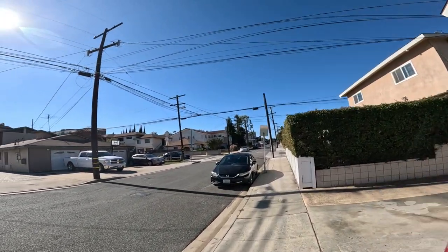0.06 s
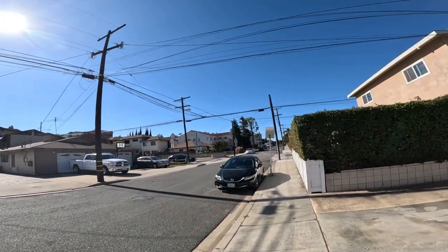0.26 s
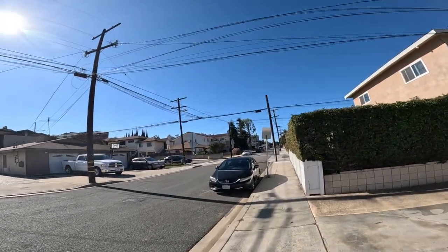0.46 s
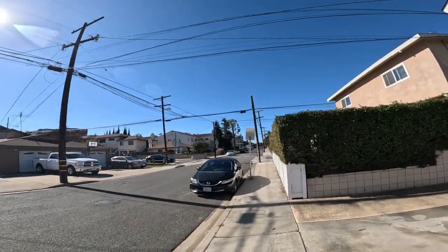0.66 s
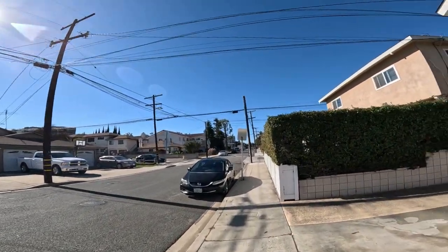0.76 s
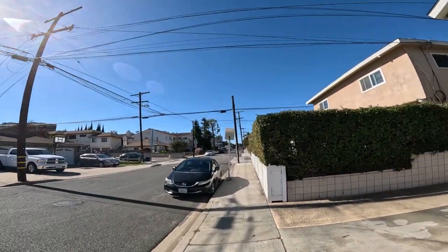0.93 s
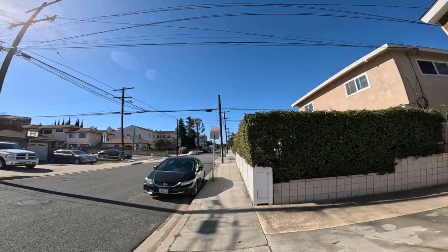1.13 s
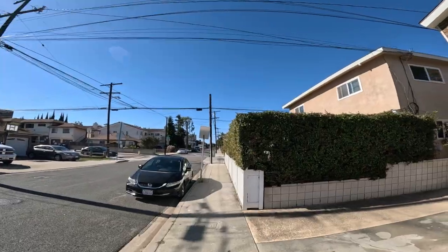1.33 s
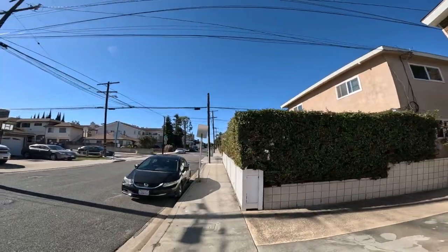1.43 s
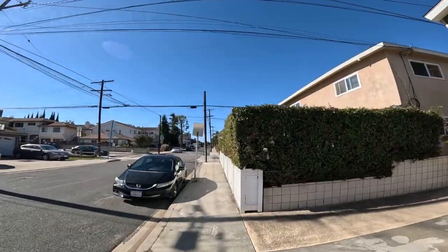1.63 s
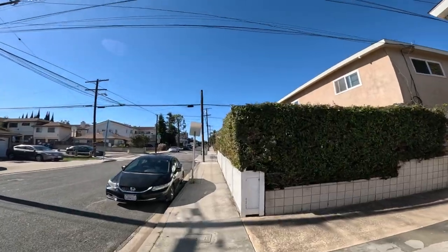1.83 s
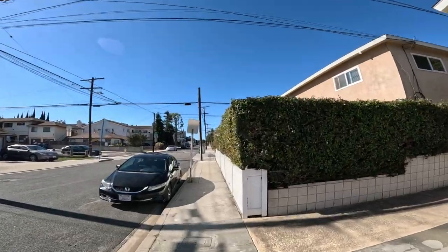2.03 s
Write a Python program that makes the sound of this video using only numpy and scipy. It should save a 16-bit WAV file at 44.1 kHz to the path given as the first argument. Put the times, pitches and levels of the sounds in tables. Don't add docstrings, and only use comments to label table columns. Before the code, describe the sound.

Low lumpy wind noise over soft, gritty footsteps on concrete in a quiet residential street

```python
import sys
import numpy as np
from scipy import signal
from scipy.fft import rfft, irfft
from scipy.io import wavfile
from scipy.ndimage import uniform_filter1d

SR = 44100
rng = np.random.default_rng(int(sys.argv[2]) if len(sys.argv) > 2 else 0)


def store_wav(level_fs):
    pcm = np.round(np.clip(np.atleast_2d(level_fs), -1, 1) * 32767)
    wavfile.write(sys.argv[1], SR, pcm.T.astype(np.int16))


def voltage_ratio(level):
    return 10 ** (np.asarray(level, float) / 20)


N = 91904


def rms_one(x):
    return x / np.sqrt(np.mean(x ** 2) + 1e-20)


def in_time(rows):
    s, *columns = np.transpose(rows)
    return [np.interp(np.arange(N) / SR, s, c) for c in columns]


def at_hz(points, hz):
    f, value = np.array(points)[:, 0], np.array(points)[:, 1]
    return np.interp(np.log(hz), np.log(f), value)


def drift(rate):
    r = np.exp(-80 * np.pi * rate / SR)
    noise = rng.standard_normal(N // 40 + 2002)
    slow = signal.lfilter([1], [1, -2 * r, r * r], noise)[2000:]
    return np.interp(np.arange(N) / 40, np.arange(len(slow)), rms_one(slow - slow.mean()))


def ring(clicks, hz, t60):
    r, w = voltage_ratio(-60 / (t60 * SR)), 2 * np.pi * hz / SR
    return signal.lfilter([0, np.sin(w)], [1, -2 * r * np.cos(w), r * r], clicks + 1e-18)


def bands(source, spectrum):
    bottom, top = spectrum[0][0], min(spectrum[-1][0], 0.35 * SR)
    edges = bottom * 2 ** np.arange(0, np.log2(top / bottom) + 0.4, 0.5)
    for k, (low, high) in enumerate(zip(edges, edges[1:])):
        hz = np.sqrt(low * high)
        sos = signal.butter(2, [low, high], "band", fs=SR, output="sos")
        settled = signal.sosfilt(sos, source[k % 2])[SR:]
        yield hz, voltage_ratio(at_hz(spectrum, hz)) * settled


def swell(start, rise, fall):
    t = np.arange(N) / SR - start
    return np.sin(np.pi / 2 * np.clip(t / rise, 0, 1)) ** 2 * np.exp(-np.maximum(t - rise, 0) / fall)


def click(s, db):
    out = np.zeros(N)
    out[int(s * SR)] = voltage_ratio(db)
    return out


# f/Hz, level/dB per Hz
HUSH = [(300, -6.5), (450, 0.5), (1130, -4.5), (2240, -13.5), (4000, -17.5), (5700, -23), (7500, -33),
        (14000, -37.5)]
# t/s, level/dB
SWELL = [(0.0, -56), (.25, -58), (.5, -55.5), (0.7, -54.5), (.9, -53), (1.1, -54.5), (1.35, -52.5),
         (1.6, -52.5), (1.85, -53), (2.08, -52)]


def hush():
    noise = rng.standard_normal((2, N + SR))
    out = sum(band * voltage_ratio(drift(6.0)) for hz, band in bands(noise, HUSH))
    return voltage_ratio(in_time(SWELL)[0] - 0.5) * rms_one(out)


# start t/s, length/s, level/dB, first f/Hz, last f/Hz
NOTES = [(0.733, 0.045, -71, 7250, 7200), (.785, .012, -75, 7250, 7250), (0.855, 0.018, -63, 3950, 3950),
         (.872, .03, -62, 3950, 3960), (0.897, 0.02, -63, 4000, 3600), (.91, .018, -60, 3950, 3700),
         (.93, .014, -64, 3600, 3550), (1.548, 0.036, -63, 2620, 2780), (1.585, 0.035, -70, 4800, 4700),
         (1.621, .014, -57, 3900, 4650), (1.632, 0.009, -58, 4850, 4950), (1.639, 0.012, -59, 4600, 4050),
         (1.655, .013, -57, 4250, 4420), (1.669, .014, -63, 4350, 4150)]
WARBLE_HZ, ECHO_S, ECHO_DB = 45, 0.006, -10
RASP, RASP_HZ = 0.27, 260


def birds():
    t, out, warble = np.arange(N) / SR, 0, WARBLE_HZ * drift(71.0)
    for s, length, db, from_hz, to_hz in NOTES:
        along = np.clip((t - s) / length, 0, 1)
        phase = 2 * np.pi * np.cumsum(from_hz + (to_hz - from_hz) * along + warble) / SR
        shape = np.sqrt(np.sin(np.pi * along).clip(0))
        out = out + np.sqrt(2) * voltage_ratio(db) * shape * np.sin(phase)
    lag = int(ECHO_S * SR)
    echoed = sum(voltage_ratio(ECHO_DB * k) * np.roll(out, int(lag * k ** 0.95)) for k in range(5))
    return echoed * voltage_ratio(drift(90.0)) * (1 - RASP + RASP * drift(RASP_HZ))


# t/s, level/dB
CLINKS = [
    (0.316, -72.5),
    (0.4777, -59),
    (0.507, -71),
    (.53, -70.5),
]
METAL_HZ = [5937, 9552]
# level/dB, time to fall 60 dB/s
METAL = [
    (0, .12),
    (-8, .07),
]


def clinks():
    knocks = sum(click(s, db) for s, db in CLINKS)
    soft = signal.windows.hann(int(0.0081 * SR))
    out = 0
    for hz, (db, t60) in zip(METAL_HZ, METAL):
        burst = soft * np.cos(2 * np.pi * hz * np.arange(len(soft)) / SR) * 4 / len(soft)
        out = out + voltage_ratio(db) * ring(np.convolve(knocks, burst)[:N], hz, t60)
    return out


# t/s, level/dB, length/s, brightness/dB per octave
SCUFFS = [(.002, -53, 0.02, -2), (.03, -51.5, 0.027, -6.5), (.085, -57.5, 0.035, -0.5),
          (.205, -58.5, 0.035, -7), (.37, -51, 0.037, -7), (.63, -56.5, 0.022, -2),
          (1.68, -54.5, 0.026, -5.5), (1.757, -48, 0.0095, -2.5), (1.785, -54, .04, -7.5),
          (0.054, -48, 0.042, -9.5), (0.309, -49, 0.08, -10.5), (0.407, -51.5, 0.03, -8),
          (0.588, -48, 0.046, -4.5), (0.604, -48.5, 0.12, -5), (0.694, -54, 0.057, -3.5),
          (0.748, -52.5, 0.12, -13.5), (1.144, -50.5, 0.041, -4), (1.168, -52.5, 0.17, -4),
          (1.578, -60.5, 0.023, -31.5), (1.663, -46, 0.066, -5.5), (1.754, -52.5, 0.07, -2.5),
          (1.873, -51.5, 0.028, -3), (1.985, -50.5, 0.033, -3)]
# f/Hz, level/dB per Hz
SOLE = [(350, -37), (600, -13), (900, -3.5), (1620, -8.5), (2400, -13), (6800, -23), (12000, -26)]
GRIT_PER_S, GRIT_DB, GRIT_LARGEST = 5000, 2, 3
SCUFF_RISE, SCUFF_TAIL = 0.39, 0.58


def scuffs():
    shape = (2, N + SR)
    hits = rng.random(shape) < GRIT_PER_S / SR
    sizes = voltage_ratio(GRIT_DB * np.minimum(rng.exponential(1, shape), GRIT_LARGEST))
    grit = hits * sizes * rng.choice([-1, 1], shape)
    slices = list(bands(grit, SOLE))
    spread = np.std(sum(band for hz, band in slices))
    out = 0
    for hz, band in slices:
        octaves = np.log2(hz / 1000)
        drags = sum(voltage_ratio(db + tilt_db * octaves) * swell(s, SCUFF_RISE * length, SCUFF_TAIL * length)
                    for s, db, length, tilt_db in SCUFFS)
        out = out + band / spread * drags
    return out


# t/s, peak level/dB, f/Hz, time to fall 60 dB/s
TICKS = [(.083, -61, 4400, .006), (.094, -60, 3950, .008), (.096, -62, 5500, .005), (.118, -59, 4000, .009),
         (.160, -42, 600, .01), (.1621, -48, 5800, .0018), (.213, -27, 330, .025), (.214, -32, 500, .017),
         (.214, -39, 750, .012), (.352, -39, 500, .02), (.381, -27, 350, .025), (.384, -35, 600, .015),
         (.424, -41, 800, .02), (.430, -33, 470, .016), (.497, -38, 420, .015), (.499, -44, 620, .014),
         (.600, -44, 780, .009), (.6111, -59, 7040, .003), (.612, -50, 1200, .01), (.624, -45, 800, .012),
         (.637, -50, 1500, .01), (.645, -55, 2210, .003), (.65, -47, 800, .012), (.835, -64, 8050, .002),
         (1.130, -34, 521, .019), (1.181, -54, 2440, .013), (1.2152, -44, 3400, .0015),
         (1.238, -54, 2250, .013), (1.597, -35, 580, .016), (1.600, -42, 800, .01), (1.672, -31, 380, .02),
         (1.691, -46, 1250, .01), (1.728, -39, 400, .015), (1.759, -41, 550, .012), (1.7615, -41, 804, .02),
         (1.7625, -41, 1360, .013), (1.763, -45, 2300, .004)]


def ticks():
    out = 0
    for s, db, hz, t60 in TICKS:
        twice = ring(ring(click(s, db), hz, t60), hz, t60)
        out = out + 2 * twice * 19 / (t60 * SR)
    return out


# t/s, length/s
OPEN = [(0.032, 0.023), (0.2, 0.021), (0.344, 0.019), (0.566, .012), (0.606, .12), (0.774, .02),
        (1.289, .03), (1.485, 0.047), (1.842, .015)]
SHELF_HZ, SHELF_DB, PATCH_DB = 7800, -7, 1.5
TOP_HZ, ABOVE_DB, OPEN_DB = 10300, -17, 1.5


def thin_top(x):
    spectrum, f, t = rfft(x, 2 * N), np.fft.rfftfreq(2 * N, 1 / SR), np.arange(N) / SR
    edges = [0, SHELF_HZ, SHELF_HZ + 900, SHELF_HZ + 1800, TOP_HZ, SR]
    parts = [irfft(spectrum * (f >= low) * (f < high), 2 * N)[:N] for low, high in zip(edges, edges[1:])]
    opened = np.clip(sum((t > s) & (t < s + length) for s, length in OPEN), 0, 1)
    top = voltage_ratio(ABOVE_DB + (OPEN_DB - ABOVE_DB) * uniform_filter1d(opened * 1.0, size=100))
    patchy = sum(p * voltage_ratio(PATCH_DB * drift(7.0)) for p in parts[1:4])
    return parts[0] + voltage_ratio(SHELF_DB) * (patchy + top * parts[4])


# t/s, f/Hz, level/dB
WHIRL = [
    (1.14, 69.96, -60),
    (1.19, 85, -16.5),
    (1.24, 114.4, -31),
    (1.31, 159.1, -24),
    (1.39, 206.6, -28.5),
    (1.42, 218.6, -52),
]


def whirl():
    hz, db = in_time(WHIRL)
    t = np.arange(N) / SR
    tone = np.sin(2 * np.pi * np.cumsum(hz * (1 + 0.077 * drift(25.0))) / SR)
    heard = (t > WHIRL[0][0]) * (t < WHIRL[-1][0])
    return np.sqrt(2) * voltage_ratio(db + 0.79 * drift(53.0)) * tone * heard


# t/s, peak level/dB, f/Hz, length/s
BUFFETS = [(0.101, -32, 328, 0.011), (0.209, -11.5, 205, 0.014), (0.249, -14.5, 229, 0.0073),
           (0.292, -35.5, 200, 0.029), (0.351, -24, 240, 0.028), (0.373, -16.5, 263, 0.04),
           (0.409, -21.5, 273, 0.036), (0.509, -16.5, 204, 0.013), (0.528, -36.5, 213, 0.012),
           (0.692, -19, 196, 0.0072), (0.776, -32.5, 197, 0.022), (0.844, -31.5, 288, 0.017),
           (1.082, -38.5, 212, 0.025), (1.123, -17.5, 202, 0.019), (1.176, -26, 242, 0.038),
           (1.251, -19.5, 202, 0.015), (1.343, -15, 213, 0.0084), (1.38, -21.5, 227, 0.035),
           (1.478, -21.5, 199, 0.032), (1.58, -17.5, 233, 0.042), (1.644, -27, 284, 0.042),
           (1.669, -9.5, 197, 0.0084), (1.86, -22, 268, 0.011), (0.013, -37.5, 275, .015),
           (0.185, -34, 298, .012), (.26, -28.5, 274, 0.014), (0.495, -27.5, 280, 0.014),
           (1.211, -22.5, 276, 0.01), (1.307, -30, 330, .012), (1.355, -27, 290, .015),
           (1.459, -28.5, 300, 0.011), (1.517, -26.5, 199, 0.021), (1.632, -27.5, 322, 0.0095),
           (1.839, -34.5, 300, .012), (1.933, -27.5, 305, 0.03), (2.028, -28, 310, 0.031)]
BUFFET_WIDTH, BUFFET_RISE_S, BUFFET_DB = 0.81, 0.011, -7


def buffets():
    out = 0
    for s, db, hz, length in BUFFETS:
        puff = rms_one(ring(rng.standard_normal(N), hz, 3.7 / (BUFFET_WIDTH * hz)))
        puff = puff / np.sqrt(uniform_filter1d(puff ** 2, int(2 * SR / hz)) + 0.49)
        out = out + voltage_ratio(db + BUFFET_DB) * puff * swell(s, BUFFET_RISE_S, length)
    return signal.sosfilt(signal.butter(3, 650, fs=SR, output="sos"), out)


# t/s, level/dB, eddy sharpness/dB
GUST = [(0.0, -24.5, -3), (0.04, -20, -5), (0.07, -27.5, -4.5), (0.16, -21, -3), (0.84, -23.5, -3.5),
        (0.86, -20, -5), (1.05, -25, -3), (1.22, -18.5, -6.5), (1.24, -25.5, -1), (1.38, -25.5, 1),
        (1.41, -29, 0), (1.49, -23, -3), (1.57, -26, 2.5), (1.6, -21, 0.5), (1.73, -25, -3.5),
        (2.02, -23.5, -5), (2.03, -28, -3), (2.08, -29.5, 1)]
# f/Hz, level/dB per Hz
WIND = [(7.1, -37.5), (12, 4), (27, 5.5), (50, 2.5), (93, 3), (200, -5.5), (343, -27), (432, -50),
        (727, -39), (1200, -46), (1560, -63), (2640, -120)]
# t/s, depth/dB
LULLS = [(.15, -6.5), (.32, -2), (.95, -4), (1.81, -9), (2.05, -8.5), (0.583, -11), (0.823, -17),
         (1.02, -7), (1.431, -4), (1.55, -4.5), (1.721, -2)]
# t/s, pressure (full scale 1), width/s
SWINGS = [
    (0.0, -.099, .008),
    (2.084, -.047, .008),
]
SHARP_FROM_HZ, SHARP_FULL_HZ, LULL_S = 71, 240, 0.02
LUMP_DB, LUMP_PER_S, FLICKER_DB = 2, 23, 1.5
EVEN_OUT, EVEN_S = 0.3, 0.027


def wind():
    t = np.arange(N) / SR
    level_db, sharp_db = in_time(GUST)
    sharp_db = sharp_db + sum(db * np.exp(-((t - s) / LULL_S) ** 2) for s, db in LULLS)
    lumps, out = drift(LUMP_PER_S), 0
    for hz, band in bands(rng.standard_normal((2, N + SR)), WIND):
        share = at_hz([(SHARP_FROM_HZ, 0), (SHARP_FULL_HZ, 1)], hz)
        out = out + band * voltage_ratio(share * (sharp_db + LUMP_DB * lumps) + FLICKER_DB * drift(5.0))
    out = out / (uniform_filter1d(out ** 2, int(EVEN_S * SR)) + 1e-12) ** (EVEN_OUT / 2)
    out = signal.sosfilt(signal.butter(4, 2500, fs=SR, output="sos"), out)
    bumps = [np.exp(-((t - s) / width) ** 2) for s, pressure, width in SWINGS]
    swings = sum(row[1] * bump for row, bump in zip(SWINGS, bumps))
    return voltage_ratio(level_db + 1.57) * rms_one(out) * (1 - sum(bumps)) + swings


def scene():
    street = thin_top(hush() + birds() + scuffs() + ticks())
    return (street + clinks() + whirl() + buffets() + wind())[None]


def band_limit(x):
    return signal.sosfilt(signal.butter(12, 15690, fs=SR, output="sos"), x)


CEILING, OFFSET = 0.8, 0.002


def record(dry):
    return band_limit(CEILING * np.tanh(dry / CEILING) + OFFSET)


dry = scene()
out = record(dry)
store_wav(out)
```